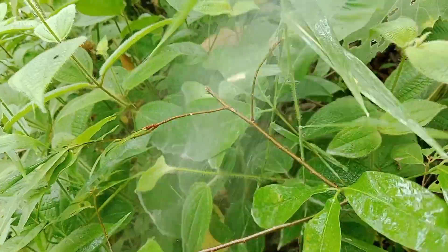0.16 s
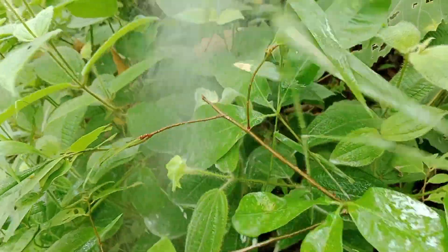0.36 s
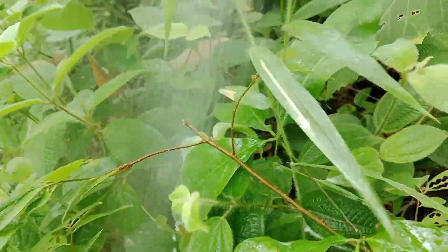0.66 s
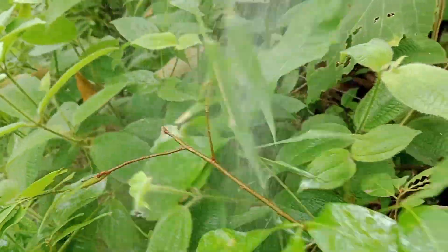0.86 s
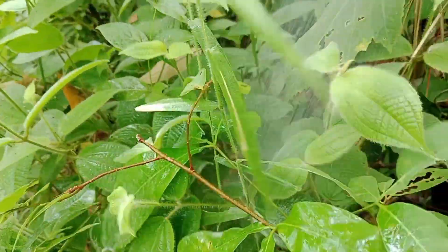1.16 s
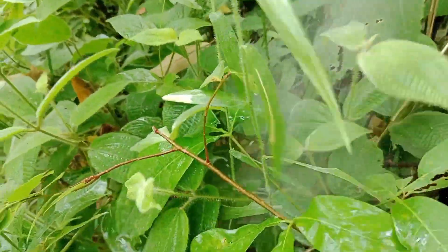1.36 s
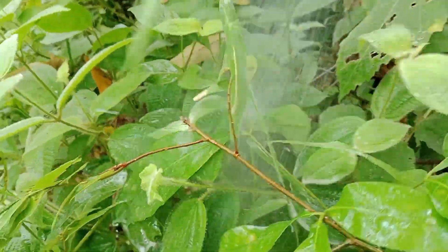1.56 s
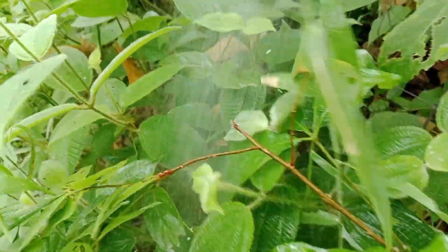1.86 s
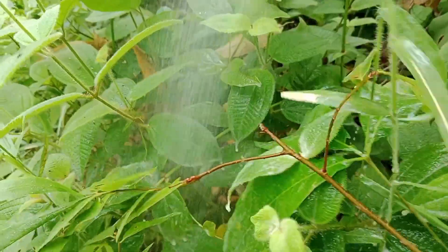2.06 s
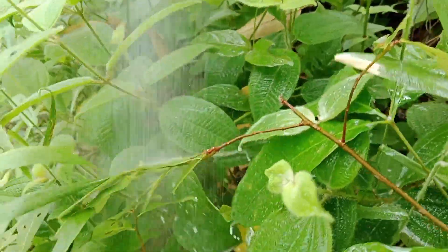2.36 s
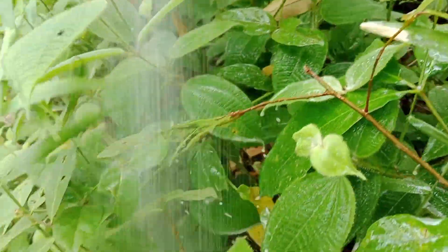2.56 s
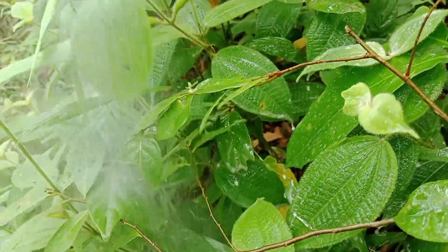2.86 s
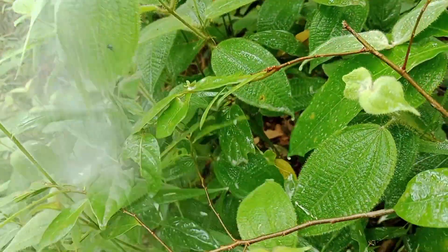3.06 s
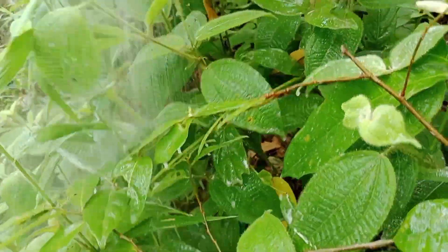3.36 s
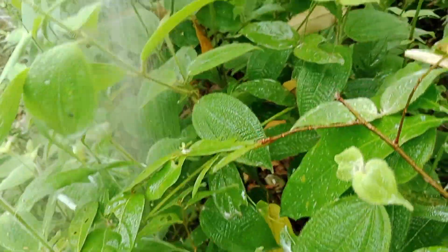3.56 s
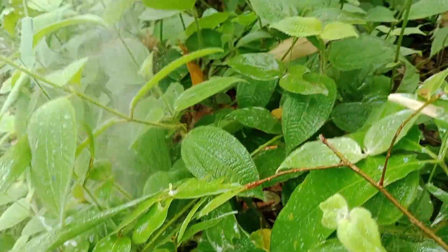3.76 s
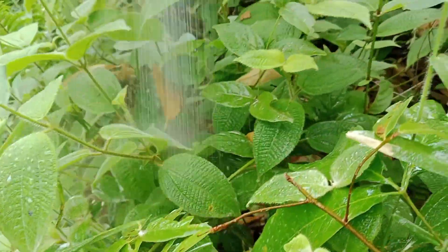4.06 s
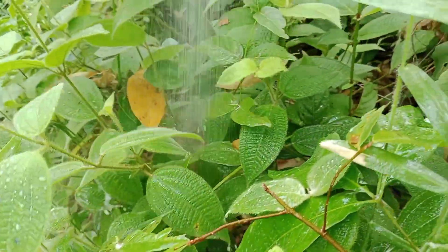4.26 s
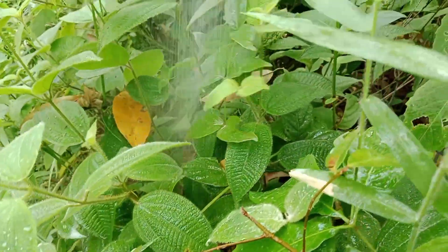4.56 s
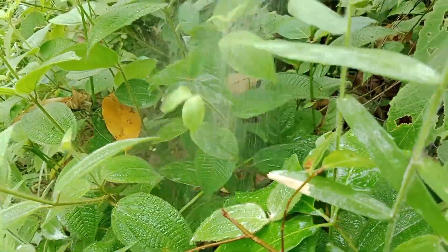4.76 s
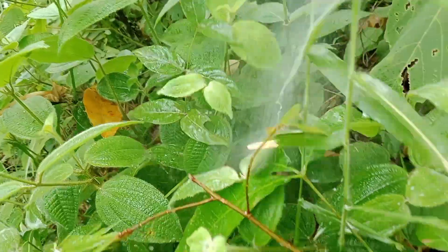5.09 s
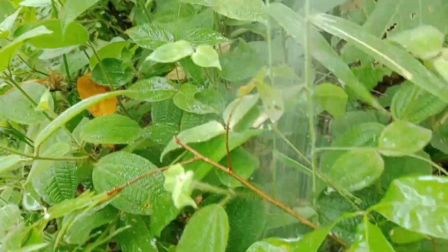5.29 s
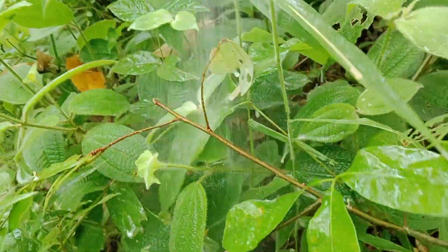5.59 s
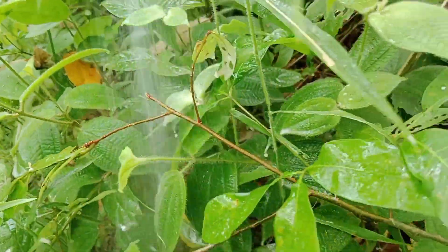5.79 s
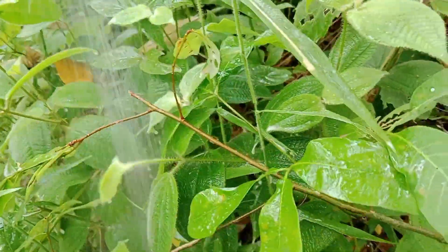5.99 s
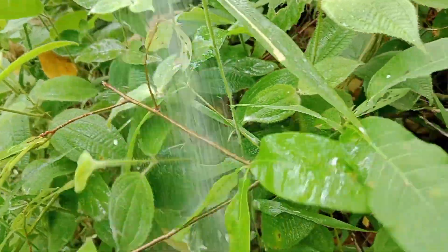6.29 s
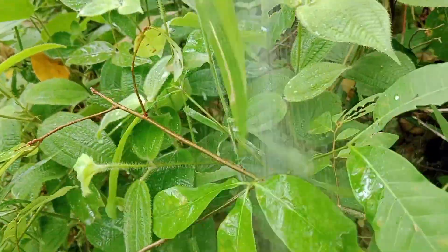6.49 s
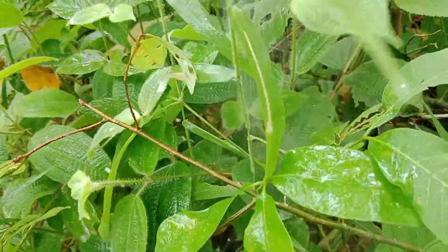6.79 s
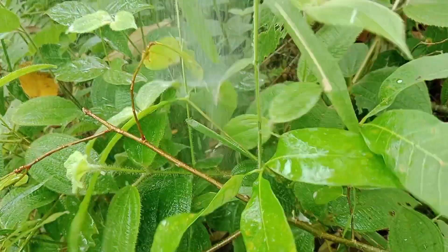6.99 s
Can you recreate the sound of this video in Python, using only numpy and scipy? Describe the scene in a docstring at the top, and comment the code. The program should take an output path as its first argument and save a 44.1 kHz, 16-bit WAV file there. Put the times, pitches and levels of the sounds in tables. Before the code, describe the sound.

A jet of fine mist hisses continuously over dense leaves, close to a small microphone in open air. The bright, grainy hiss swells and dips as the nozzle swings, with crisp drops pattering on foliage, short sizzling flares and occasional sharp smacks. It thins after three seconds, comes back near five, dips around six, then revives. Faint wash and very weak air rumble lie beneath.

```python
"""A hand sprayer sweeps a jet of mist over leafy undergrowth, close to a small microphone.
The hiss is noise and thousands of tiny random clicks; it sinks and swells as the nozzle swings, and
flares into a sizzle when the jet brushes a near blade. Heavier drops patter on the leaves as filtered
clicks, and fat ones smack as short decaying tones. Single leaves drum: streams of clicks ring a gliding
resonance. Behind them lie the soft wash of spray on stems and ground, and a low rumble of moving air."""
import sys
import numpy as np
from scipy import signal
from scipy.fft import rfft, irfft
from scipy.io import wavfile

SR = 44100
rng = np.random.default_rng(int(sys.argv[2]) if len(sys.argv) > 2 else 0)


def unload_wav(signal):
    """Save mono or channel-first audio to the path in sys.argv[1] as 16-bit WAV at rate SR, clipped to [-1, 1]."""
    wavfile.write(
        sys.argv[1],
        SR,
        np.round(np.clip(np.atleast_2d(signal).T, -1, 1) * 32767).astype(np.int16),
    )


N = 314874  # length in samples
WINDOW, HOP = 1024, 256  # samples in one slice of the time-varying filters, and from slice to slice
BINS = np.fft.rfftfreq(WINDOW, 1 / SR)  # pitches in Hz at which those filters are set
FRAMES = np.arange(N // HOP + 2) * HOP / SR  # moments in seconds at which they are set
TIME = np.arange(N) / SR  # seconds
EDGE_HZ = 15500  # nothing is heard above this
USUAL_MIST_DB, USUAL_LANDING_DB = -38, -48

# Fine spray, louder as the nozzle swings near. Each row: time in seconds, level in dB.
MIST_LEVEL = [(0.0, -33), (0.38, -39.5), (0.86, -37.5), (1.0, -32), (1.08, -35.5), (1.82, -37),
              (1.98, -40.5), (2.17, -36.5), (2.3, -36), (2.4, -39), (2.56, -40.5), (2.64, -36),
              (3.08, -35.5), (3.18, -38.5), (3.9, -45), (4.35, -44), (4.42, -47), (4.78, -45),
              (4.88, -39.5), (5.72, -40.5), (6.06, -48.0), (6.36, -45.5), (6.54, -37), (6.72, -40),
              (6.94, -39), (7.13, -43.5)]
# Drops landing on leaves, louder where the jet meets more of them. Each row: time in seconds, level in dB.
LANDING_LEVEL = [(0, -43), (.14, -46.5), (.19, -41), (.27, -47.5), (.44, -44), (.6, -39.5), (.77, -42),
                 (.85, -46), (.99, -45), (1.06, -47), (1.35, -44.5), (1.5, -44.5), (1.65, -48.5),
                 (1.82, -44.5), (1.9, -48), (2.02, -41.5), (2.11, -40.5), (2.24, -39), (2.45, -48.5),
                 (2.66, -51), (2.75, -54), (2.82, -50), (2.89, -44), (2.97, -47), (3.06, -47), (3.2, -56),
                 (3.55, -56), (3.9, -57.5), (4.08, -57.5), (4.14, -52), (4.19, -55), (4.34, -44.5),
                 (4.375, -52.5), (4.405, -58), (4.78, -58), (4.89, -46), (5.1, -46.5), (5.26, -52),
                 (5.49, -49), (5.57, -51.5), (5.65, -49), (5.74, -47), (5.82, -50.5), (6.05, -55),
                 (6.27, -53), (6.33, -52.5), (6.44, -56.5), (6.5, -54), (6.545, -45), (6.67, -44),
                 (6.76, -46), (6.83, -42), (6.9, -46), (6.95, -42.5), (6.99, -50.5), (7.07, -55.5),
                 (7.14, -50.5)]
# Tone colour of the fine spray. Each row: pitch in Hz, relative level in dB.
HISS_COLOUR = [(60, -56), (300, -48.5), (3500, -52), (5000, -24.5), (5400, -15), (6000, -14), (6550, -8.5),
               (7200, -5), (8600, -9), (9350, -15), (10000, -4), (10800, 1.5), (11400, -3.5), (12900, -4),
               (13900, -13), (14900, -7)]
# Tone colour of the drops on leaves. Each row: pitch in Hz, relative level in dB.
PATTER_COLOUR = [(60, -58), (250, -33), (650, -33), (1100, -31.5), (1230, -17.5), (1400, -7), (1700, -6.5),
                 (1930, -2), (3090, 2.5), (4140, -5), (4500, -17), (5850, -45), (9900, -120)]
# Tone colour of the wash on stems and ground. Each row: pitch in Hz, relative level in dB.
WASH_COLOUR = [(100, -28), (250, -6), (500, -4), (800, 3), (1200, 2), (2500, 6), (6000, -6.5)]
# Tone colour of the stirred air. Each row: pitch in Hz, relative level in dB.
RUMBLE_COLOUR = [(20, -18), (45, -8), (70, -3), (110, 0.5), (160, 1.5), (260, -4.5), (500, -4.5),
                 (2000, -51)]
# Lower half of the hiss, which turns with the nozzle's aim. Each row: time in seconds, change in dB.
LOWER_HISS = [(0, -1.5), (.6, 1.2), (1.0, -2.5), (1.1, 0), (1.3, -1), (1.47, 3), (1.7, -2), (2.15, 1.5),
              (2.5, -2.5), (2.64, 1), (3.0, -3), (3.88, 1), (4.7, 2.5), (5.15, -1), (5.73, -0.5), (6.0, 1),
              (6.3, 0.5), (6.9, 1.5), (7.14, -1)]
# Treble of the patter, crisp on some leaves and dull on others. Each row: time in seconds, change in dB.
PATTER_TREBLE = [(0, 1), (.22, -4.5), (.68, -6.5), (1.12, 6), (1.3, 3.5), (1.55, 3), (1.82, 1), (2.03, -5),
                 (2.14, -5), (2.24, -.5), (2.4, 3), (2.6, -5), (2.78, 6), (2.95, -2.5), (3.25, -2),
                 (3.5, -9), (3.75, 3), (3.95, -4), (4.25, 5.5), (4.45, -6), (4.63, 4), (4.7, 8), (4.86, -2),
                 (4.96, 2.5), (5.3, 3), (5.7, 0), (6.05, -11), (6.22, -9), (6.35, 5), (6.5, 5), (6.58, 2),
                 (6.9, 4.5), (7.14, -3)]
# A narrow band of the patter drops out briefly. The row: middle in seconds, half length in seconds,
# centre in Hz, half width in Hz, depth in dB.
PATTER_DIP = (4.63, 0.06, 3600, 380, -24)
# The jet brushes a near blade. Each row: peak in seconds, rise in seconds, fall in seconds, level in dB.
FLARES = [(.222, 0.026, 0.017, -33), (.356, 0.012, 0.012, -30.5), (.495, 0.022, 0.012, -30.5),
          (.62, 0.026, 0.0078, -29.5), (.94, 0.013, 0.013, -33), (1.79, 0.064, 0.082, -28.5),
          (1.831, 0.0032, 0.0027, -27), (1.941, .012, 0.0049, -33), (2.069, 0.0074, 0.0071, -28),
          (4.14, .012, 0.017, -41.5), (4.885, 0.011, 0.022, -36), (6.585, 0.0068, 0.0035, -29.5)]
# A fat drop smacks a near leaf. Each row: start in seconds, leaf pitch in Hz, peak level in dB.
SMACKS = [(1.108, 3700, -30), (1.467, 2800, -33), (1.786, 2920, -33), (2.227, 2640, -31),
          (2.301, 2970, -26), (2.392, 2730, -33), (3.004, 2940, -34), (3.834, 3180, -43),
          (5.392, 2910, -35), (5.511, 2700, -37), (5.696, 2700, -41)]
# One leaf drums under the jet. Each row: middle in seconds, half length in seconds, pitch in Hz,
# glide in octaves per second, width of the resonance in Hz, level in dB.
DRUMMING_LEAVES = [(.008, 0.015, 396, -6, 70, -60.5), (0.084, 0.025, 413, -2, 70, -63.5),
                   (.17, 0.13, 145, -0.5, 50, -71), (.173, 0.054, 1030, 1.5, 100, -62.5),
                   (0.431, 0.059, 1250, 1.5, 130, -56), (.49, .03, 380, -4, 140, -72),
                   (0.598, 0.065, 1020, 4.5, 160, -59.5), (0.678, .05, 1250, -1, 110, -58),
                   (0.708, 0.045, 1016, 1.5, 90, -54), (0.737, 0.027, 800, 1, 90, -59),
                   (0.812, 0.038, 935, -1, 90, -62), (.83, 0.028, 382, 6, 110, -64.5),
                   (0.964, .045, 350, 8, 160, -71), (1.002, .025, 1950, -2, 300, -48),
                   (1.06, 0.13, 144, 0.5, 45, -71.5), (1.156, 0.025, 2050, -1, 180, -52),
                   (1.248, 0.052, 1510, 4.5, 200, -55), (1.437, 0.1, 1600, -1.5, 180, -53),
                   (1.787, 0.038, 263, -2, 113, -68.5), (1.818, 0.23, 930, -1, 305, -66.5),
                   (2.122, 0.087, 860, -0.5, 220, -60.5), (2.254, 0.045, 723, -1.5, 80, -56.5),
                   (2.326, 0.025, 600, -3, 90, -67), (2.184, 0.24, 1506, 0, 130, -52),
                   (2.13, 0.14, 3200, -0.5, 380, -47.5), (3.2, 0.35, 3360, 0.1, 520, -55.5),
                   (3.695, 0.51, 1440, 0.5, 200, -74), (4.154, 0.25, 2750, 0, 300, -56),
                   (4.307, 0.036, 870, 2, 298, -67.5), (4.876, .025, 1160, 1, 150, -61.5),
                   (5.04, 0.14, 860, 1.5, 160, -70), (5.108, 0.04, 1600, 0, 320, -52),
                   (5.497, 0.063, 1290, -0.5, 200, -61.5), (5.6, 0.24, 1826, 0.5, 170, -53.5),
                   (5.46, 0.074, 3020, -1, 330, -49), (5.673, 0.093, 2980, 0, 380, -51.5),
                   (5.672, 0.037, 336, 1, 110, -70.5), (5.727, .033, 1180, 2.5, 120, -57.5),
                   (5.856, 0.017, 300, 12, 90, -76), (6.023, 0.25, 1242, 0.4, 102, -61.5),
                   (6.067, 0.018, 1280, 0.5, 110, -55.5), (6.13, 0.31, 3080, 0.5, 220, -57.5),
                   (6.353, 0.05, 1450, -1.5, 200, -55), (6.626, 0.066, 1570, 1, 300, -50),
                   (6.714, 0.046, 1280, -2, 131, -51), (6.82, 0.063, 1420, -1.5, 240, -49),
                   (6.813, 0.044, 330, 7, 90, -70), (6.94, 0.073, 1510, -0.5, 170, -53)]
# The jet's air brushes the microphone. Each row: middle in seconds, half length in seconds, level in dB.
GUSTS = [(.125, .022, -71), (0.223, .03, -77), (.49, .025, -70), (0.627, 0.02, -74), (.756, .04, -75),
         (1.01, 0.03, -76), (1.08, .03, -80), (1.47, .04, -83), (1.77, .025, -74), (1.837, 0.023, -71),
         (6.594, 0.031, -70), (6.797, .03, -79)]
# A narrow gap in the sound, at times filled in. Each row: time in seconds, level in dB in its middle.
GAP_LEVEL = [(0, -54), (.6, -46), (1.8, -46), (2.06, -19), (2.13, 1), (2.33, 3), (2.46, -38), (3.4, -52),
             (3.75, -32), (4.0, -33), (4.27, -16), (4.45, -52), (6.4, -50), (6.8, -47), (7.14, -50)]

# How parts follow the jet. Each row: dB at the usual levels, dB per dB of mist, dB per dB of landing drops.
# Strength of single leaf resonances in the patter:
RESONANCE_DEPTH = (2.94, 0, -0.16)
# Low edge of the hiss:
LOW_EDGE = (-.3, 0.041, 0.2)
# Top of the hiss:
TOP_FIZZ = (-1.2, .15, -0.025)
# Low part of the patter, from broad leaves:
BROAD_LEAVES = (-1.1, -0.11, -0.27)
# Level of the wash:
WASH_LEVEL = (-74, 0.62, 0.11)
# Level of the stirred air:
AIR_LEVEL = (-83, 0.36, .05)
# Width of the gap:
GAP_WIDTH = (-0.53, 0.04, -0.19)


def mist(drops):
    """Countless fine droplets hiss, with the spatter of heavier ones; the jet sputters and its colour turns."""
    aim = follow(LOWER_HISS, FRAMES) + .5 * sway(per_s=30)
    lower = np.interp(BINS, [9000, 9900], [1, 0])[:, None] * aim
    top = np.interp(BINS, [13100, 14000], [0, 1])[:, None] * with_jet(TOP_FIZZ, FRAMES)
    edge = np.interp(BINS, [6000, 6700], [1, 0])[:, None] * with_jet(LOW_EDGE, FRAMES)
    # echoes off the nearest leaves ripple the lower hiss most
    ripple_db = np.interp(BINS, [5500, 8000], [2.4, 1])[:, None]
    ripple = ripple_db * patches(width_hz=330, length_s=.16)
    sputter = gain_of(0.49 * wander(per_s=150) + 0.31 * wander(per_s=27))
    droplets = impacts(per_s=8000, spread_db=2.0, blur=1.6)
    spray = evened(droplets + 1.19 * drops) * sputter
    hiss = colour(spray, read(HISS_COLOUR) + lower + edge + top + ripple, (9800, 13300))
    return hiss * gain_of(follow(MIST_LEVEL, TIME))


def flares():
    """The jet shatters on a near blade in a brief, ragged sizzle, made of noise sharper than the hiss."""
    level = np.zeros(N)
    for peak_s, rise_s, fall_s, db in FLARES:
        slope_s = np.where(TIME < peak_s, rise_s, fall_s)
        level += gain_of(db) * np.exp(-abs((TIME - peak_s) / slope_s) ** 3)
    sharper = read([(5000, 4.5), (8000, 3.6), (10700, 12.1), (12500, 6.7), (15000, 9.1)])  # (Hz, dB)
    sizzle = colour(rng.standard_normal(N), read(HISS_COLOUR) + sharper, (5000, EDGE_HZ))
    ragged = gain_of(1.2 * wander(per_s=350))
    return level * evened(sizzle * ragged)


def patter(drops):
    """Heavier drops tick on many leaves, whose short resonances shift as the jet sweeps on."""
    broad_db = with_jet(BROAD_LEAVES, FRAMES) + 0.7 * sway(per_s=26)
    broad = np.interp(BINS, [1550, 2000], [1, 0])[:, None] * broad_db
    treble = np.interp(BINS, [3500, 3900], [0, 1])[:, None] * follow(PATTER_TREBLE, FRAMES)
    # the fewer leaves the jet meets, the more their single resonances stand out
    depth_db = np.clip(with_jet(RESONANCE_DEPTH, FRAMES), 1.5, 4)
    resonances = depth_db * patches(width_hz=170, length_s=.1)
    field = read(PATTER_COLOUR) + broad + treble + resonances + patter_dip()
    ticks = colour(drops, field, (1800, 3600))
    return ticks * gain_of(follow(LANDING_LEVEL, TIME) + .7 * wander(per_s=30))


def patter_dip():
    """One narrow band of the patter fades out and back within a moment, as dB over pitch and time."""
    middle_s, half_s, centre_hz, half_hz, db = PATTER_DIP
    in_time = ((FRAMES - middle_s) / half_s) ** 2
    in_pitch = ((BINS[:, None] - centre_hz) / half_hz) ** 2
    return db * np.exp(-in_time - in_pitch)


def smacks(peak_after_s=0.00033):
    """Each fat drop gives one sharp tick, which the wet leaf damps within a few cycles."""
    t, out = np.arange(0, .01, 1 / SR), np.zeros(N)
    swell_and_fade = t / peak_after_s * np.exp(1 - t / peak_after_s)  # reaches one, then dies away
    for start_s, hz, db in SMACKS:
        tick = np.sin(2 * np.pi * hz * t) * swell_and_fade
        out[round(start_s * SR):][:len(t)] += gain_of(db) * tick
    return out


def drumming():
    """A leaf struck by a stream of drops rings at its own pitch, which slides as it bends, until the jet moves off."""
    drops, out = impacts(per_s=870, spread_db=2.0, blur=0.93), np.zeros(N)
    for middle_s, half_s, hz, glide, width_hz, db in DRUMMING_LEAVES:
        near = abs(TIME - middle_s) < 3 * half_s
        t = TIME[near] - middle_s
        stream = np.roll(drops, rng.integers(N))[near]  # other drops for each leaf
        swell = np.exp(-(t / half_s) ** 2)
        out[near] += gain_of(db) * swell * ring(stream, hz * 2 ** (glide * t), width_hz)
    return out


def wash():
    """The soft push of the spray on stems and ground: blurred impacts with a shifting colour."""
    field = read(WASH_COLOUR) + 2.2 * patches(width_hz=260, length_s=.14)
    rush = colour(impacts(per_s=1500, spread_db=2.5, blur=.8), field, (350, 900))
    return rush * gain_of(with_jet(WASH_LEVEL, TIME))


def rumble():
    """Air dragged along by the jet buffets the microphone faintly, with a few gusts: low, unsteady noise."""
    hz, db = np.transpose(RUMBLE_COLOUR)
    pitches = np.fft.rfftfreq(N, 1 / SR)
    shape = gain_of(np.interp(np.log(pitches + 1), np.log(hz), db))
    air = evened(irfft(rfft(rng.standard_normal(N)) * shape, N))
    level = gain_of(with_jet(AIR_LEVEL, TIME))
    for middle_s, half_s, gust_db in GUSTS:
        level += gain_of(gust_db) * np.exp(-((TIME - middle_s) / half_s) ** 2)
    return air * level * gain_of(2.3 * wander(per_s=8.4))


def impacts(per_s, spread_db, blur):
    """Droplets strike at random, a few much harder than most, over a blur of tiny ones."""
    size = gain_of(spread_db * np.minimum(rng.exponential(1, N), 4))
    struck = rng.random(N) < per_s / SR
    hits = size * struck * rng.choice([-1, 1], N)
    return evened(evened(hits) + blur * rng.standard_normal(N))


def ring(x, hz, width_hz):
    """A damped resonance with steep skirts, whose pitch follows a curve."""
    turn = np.exp(2j * np.pi * np.cumsum(hz) / SR)
    r = np.exp(-np.pi * 2 * width_hz / SR)
    x = x / turn  # shift the leaf's pitch down to zero, smooth there, and shift back
    for _ in range(3):
        x = signal.lfilter([1 - r], [1, -r], x)
    return evened((x * turn).real)


def patches(width_hz, length_s):
    """Smooth chance over pitch and time: ever different leaves lie in the jet."""
    field = np.fft.rfft2(rng.standard_normal((640, 1280)))  # larger than needed, then cut
    across = np.fft.fftfreq(len(field), BINS[1])[:, None] * width_hz
    along = np.linspace(0, .5 / FRAMES[1], field.shape[1]) * length_s
    smooth = np.fft.irfft2(field * np.exp(-across ** 2 - along ** 2))
    return evened(smooth[:len(BINS), :len(FRAMES)])


def wander(per_s):
    """Smooth chance of rms one, with few changes faster than the given rate."""
    keep = np.exp(-(np.fft.rfftfreq(N, 1 / SR) / per_s) ** 2)
    return evened(irfft(rfft(rng.standard_normal(N)) * keep, N))


def sway(per_s):
    """Smooth random change at every frame."""
    return np.interp(FRAMES, TIME, wander(per_s))


def follow(curve, times):
    """A curve at the given times, with straight lines between its points."""
    return np.interp(times, *np.transpose(curve))


def with_jet(rule, times):
    """The dB of a part that follows the mist and the landing drops, each by its own amount."""
    db, per_mist, per_landing = rule
    more_mist = follow(MIST_LEVEL, times) - USUAL_MIST_DB
    more_landing = follow(LANDING_LEVEL, times) - USUAL_LANDING_DB
    return db + per_mist * more_mist + per_landing * more_landing


def gain_of(db):
    """Decibels to amplitude."""
    return 10 ** (np.asarray(db) / 20)


def evened(x):
    """Scales to an rms (average strength) of one."""
    return x / np.sqrt(np.mean(x ** 2) + 1e-20)


def read(points):
    """A tone colour in dB at every bin, joined on a log-frequency axis."""
    hz, db = np.transpose(points)
    return np.interp(np.log(BINS + 1), np.log(hz + 1), db)[:, None]


def colour(x, db, band):
    """Filters by dB over pitch and time, scaled so that white noise of rms one has unit power in the band (Hz)."""
    gain = gain_of(db)
    inside = (BINS > band[0]) & (BINS < band[1])
    power = (gain[inside] ** 2).sum(0) / len(BINS)
    return reshape(x, gain / np.sqrt(power))


def reshape(x, gain):
    """Filters by a gain that changes over pitch and time."""
    z = signal.stft(x, nperseg=WINDOW, noverlap=WINDOW - HOP)[2][..., :len(FRAMES)]
    return signal.istft(z * gain, nperseg=WINDOW, noverlap=WINDOW - HOP)[1][..., :N]


def scene():
    """All the sounds of the spray, in open air; the same heavy drops both tick and spatter."""
    drops = impacts(per_s=2600, spread_db=1.04, blur=0.54) * gain_of(.5 * wander(per_s=9.9))
    near = mist(drops) + flares() + patter(drops) + smacks() + drumming()
    return (near + wash() + rumble())[None]


def narrow_gap(x, start_hz, climb_hz_per_s, drift_hz, usual_width_hz):
    """A narrow band near 4.8 kHz is missing; the gap creeps upward, wavers, and widens when few drops land."""
    centre = start_hz + climb_hz_per_s * FRAMES + drift_hz * sway(per_s=13)
    waver = np.exp(.17 * sway(per_s=16) + .12 * sway(per_s=45))
    half_width = usual_width_hz * waver * gain_of(with_jet(GAP_WIDTH, FRAMES))
    skirt = abs((BINS[:, None] - centre) / half_width) ** 11  # small inside the gap, huge outside
    floor = gain_of(follow(GAP_LEVEL, FRAMES)) ** 2
    return reshape(x, np.sqrt((floor + skirt) / (1 + skirt)))


def record(dry):
    """The narrow gap, then a steep filter that removes the highest treble."""
    heard = narrow_gap(dry, start_hz=4795, climb_hz_per_s=7.0, drift_hz=41.3, usual_width_hz=325)
    band_limit = signal.firwin(1201, EDGE_HZ, window=("kaiser", 9), fs=SR)
    return signal.oaconvolve(heard, band_limit[None], "same")


dry = scene()
out = record(dry)
unload_wav(out)
```